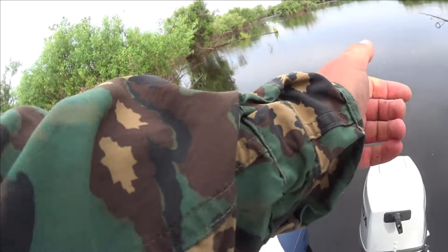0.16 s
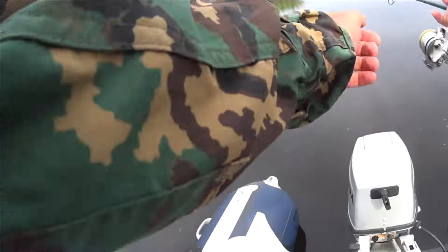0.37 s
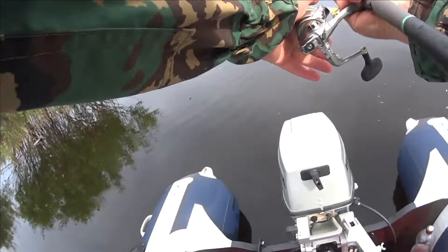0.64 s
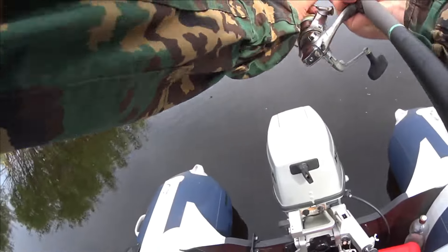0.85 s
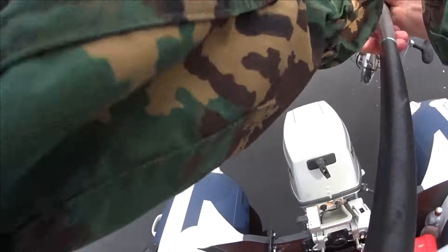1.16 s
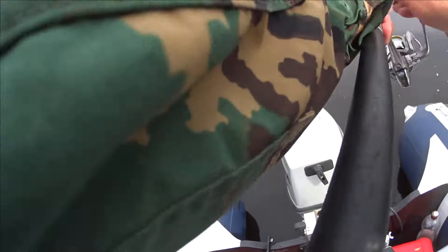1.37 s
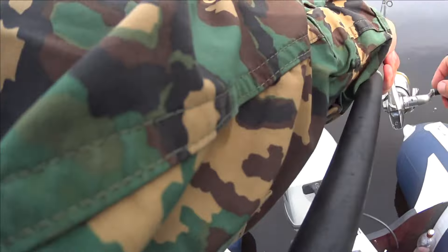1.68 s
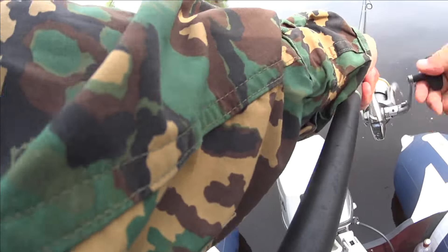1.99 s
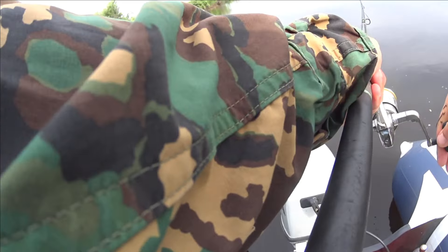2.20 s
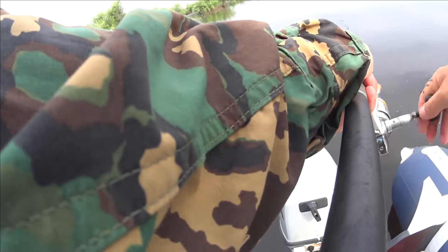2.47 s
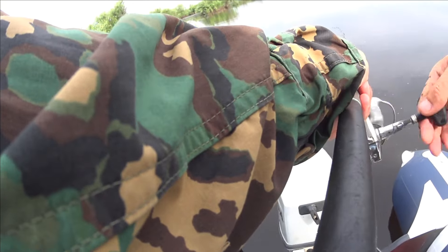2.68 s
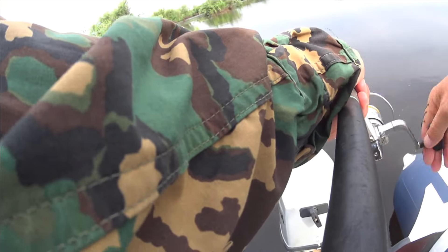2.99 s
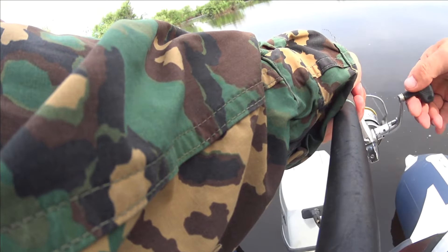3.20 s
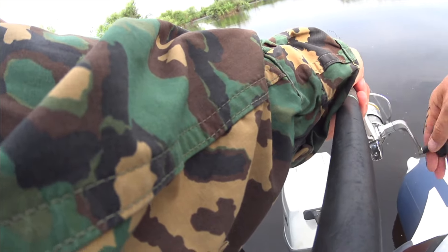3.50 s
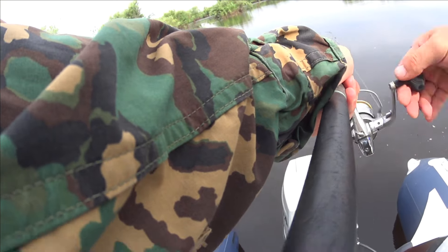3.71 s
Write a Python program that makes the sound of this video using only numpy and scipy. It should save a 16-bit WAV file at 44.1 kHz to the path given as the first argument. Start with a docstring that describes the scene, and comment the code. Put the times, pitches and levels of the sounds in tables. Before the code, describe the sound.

Many terns chatter and cry over each other around a small boat as fishing gear snaps once.

```python
"""A colony of water birds, probably terns, calls around a small boat near a bushy lake shore.
Over a low rumble, harsh rasps, far chatter and a thin whistle sound first; clear, fluttering cries soon join.
Soft knocks of hand and gear begin early; near 0.9 s the reel ticks and the tackle snaps; later a small bird chips.
Voices are harmonic series, with throat noise in the rasps; the snap is damped modes and noise, the knocks
and rumble are coloured noise, and the shore returns a faint, diffuse echo of the birds."""
import sys
import numpy as np
from scipy import signal
from scipy.fft import rfft, irfft
from scipy.io import wavfile
from scipy.ndimage import map_coordinates

SR = 44100
rng = np.random.default_rng(int(sys.argv[2]) if len(sys.argv) > 2 else 0)


def int16_out(signal):
    """Quantize to a 16-bit WAV file."""
    q = np.round(np.clip(np.atleast_2d(signal).T, -1, 1) * 32767)
    wavfile.write(sys.argv[1], SR, q.astype(np.int16))


N = 169785  # samples, 3.85 s

# Spectral density of the low rumble: frequency_hz, relative_density_db
RUMBLE_SPECTRUM = [(15, -35), (25, 0), (54, -3.5), (79, 1), (167, -9), (375, -11), (432, -13), (684, -16),
                   (954, -21), (1100, -22), (1430, -44), (2420, -120)]
# Level of the sleeve's rustle: time_s, level_db
RUSTLE_LEVEL = [(0, -62), (.45, -51.5), (.9, -60), (1.3, -54.5), (1.9, -65), (3.85, -68)]
# Spectral density of the rustle: frequency_hz, relative_density_db
RUSTLE_SPECTRUM = [(100, -12), (250, -7), (500, -9.5), (1000, -9.5), (4000, -10.5), (11000, -36)]
# Spectral density of the blur of far birds: frequency_hz, relative_density_db
COLONY_SPECTRUM = [(530, -44), (900, -26.5), (1280, -8.5), (1830, -23), (2490, -4.5), (2880, -11.5),
                   (3370, -4), (4150, -18), (5070, -13.5), (6250, -22), (11000, -32.5), (14300, -70),
                   (22000, -120)]
# Level of the chattering flock further off: time_s, level_db
FLOCK_LEVEL = [(.2, -56), (.5, -50), (1.4, -51), (2.2, -57.5), (3.85, -57.5)]
# Harsh rasps: start_s, length_s, pitch_hz, level_db, tilt_db_per_octave
RASPS = [(0, 0.22, 1563, -43.5, 1), (.17, 0.064, 1615, -43.5, -0.5), (0.349, 0.081, 1597, -39, 4),
         (0.424, 0.11, 1700, -38.5, 2.5), (.69, 0.14, 1720, -38, 4.5), (0.826, .11, 1685, -35.5, 3),
         (0.941, .165, 1619, -39, 1.5), (1.102, 0.11, 1596, -43.5, 1), (1.24, 0.18, 1622, -42, 3),
         (1.429, 0.1, 1648, -43.5, 4), (1.555, .13, 1650, -42.5, 2), (1.859, 0.19, 1657, -42.5, -1),
         (2.238, .19, 1666, -43, -3), (2.424, 0.11, 1590, -48.5, -4), (2.615, 0.179, 1620, -47.5, -4.5),
         (2.796, 0.099, 1653, -51.5, -5), (2.977, 0.078, 1644, -48, -4), (3.051, 0.16, 1631, -45.5, -5),
         (3.294, 0.03, 1710, -53.5, -2), (3.351, 0.09, 1649, -45.5, -2), (3.432, 0.13, 1582, -47.5, -2.5),
         (3.712, 0.14, 1651, -47.5, -2.5)]
# Harmonics of a rasp, first to sixth: relative_level_db
RASP_HARMONICS_DB = [-14, 2.5, -6, -15.5, -21, -24.5]
# Spectral density of turbulence in the throat: frequency_hz, relative_density_db
THROAT_SPECTRUM = [(530, -60), (900, -37), (1110, -24.5), (1280, -7.5), (1440, -12), (1740, -7.5),
                   (2100, -16), (3200, -1.5), (3740, -5), (4710, -1), (5450, -27.5), (5990, -9),
                   (7540, -34.5), (8920, -25), (11000, -53), (14300, -68), (22000, -120)]
# Level of the thin whistle: time_s, level_db
WHISTLE_LEVEL = [(2., -64), (2.1, -61.5), (2.5, -63), (2.85, -57), (3.1, -65), (3.24, -56.5), (3.3, -65.5),
                 (3.56, -56.5), (3.58, -59), (3.62, -58), (3.66, -45), (3.685, -54), (3.74, -61)]
# Clear cries: start_s, length_s, start_pitch_hz, middle_pitch_hz, end_pitch_hz, level_db,
# extra_db (all harmonics but the second), flutter_hz (none unless positive)
CRIES = [(0.165, 0.22, 1855, 1795, 1762, -50, 11.5, 32.5), (0.381, 0.037, 1722, 1680, 1606, -38, 2, 0),
         (.435, 0.23, 1695, 1695, 1620, -38.5, -4.5, 44), (0.531, 0.043, 1790, 1986, 1820, -38.5, -6, 48),
         (0.716, .11, 1778, 1785, 1717, -39.5, 3.5, 36), (0.883, 0.044, 1810, 1936, 1750, -41, 1, 0),
         (0.935, 0.088, 1650, 1584, 1498, -34.5, -3.5, 40.5), (1.038, .065, 1620, 1700, 1574, -36, -1.5, 0),
         (1.09, 0.056, 1436, 1373, 1350, -46, 1.5, 45.5), (1.2, 0.044, 1780, 1750, 1600, -39, -2, 0),
         (1.244, 0.14, 1640, 1582, 1650, -44.5, 6, 40.5), (1.374, 0.068, 1674, 1705, 1630, -43.5, 5, 0),
         (1.464, 0.12, 1740, 1883, 1794, -39.5, 1.5, 32), (1.515, 0.035, 1660, 1740, 1680, -38.5, -2, 0),
         (1.563, .1, 1804, 1662, 1565, -45.5, 5.5, 48), (1.677, .185, 1853, 1800, 1715, -41, -1, 39),
         (1.687, 0.09, 1600, 1567, 1510, -47.5, 3.5, 38.5), (1.879, .06, 1722, 1625, 1573, -44, -0.5, -0.5),
         (2.027, 0.044, 1757, 1740, 1630, -44.5, 1.5, 0), (2.054, 0.044, 1916, 1846, 1710, -42.5, 0, 0),
         (2.111, 0.029, 1673, 1715, 1630, -47.5, -0.5, 0), (2.141, 0.036, 1624, 1740, 1550, -53.5, 11.5, 0),
         (2.178, 0.046, 1670, 1652, 1590, -51, 7.5, 0), (2.221, 0.057, 1677, 1668, 1580, -45.5, 6, 0),
         (2.386, 0.045, 1660, 1703, 1620, -47.5, -8, -0.5),
         (2.426, 0.051, 1820, 1830, 1625, -46.5, -1, -4.5), (2.533, 0.035, 1628, 1693, 1600, -40.5, 0, 0),
         (2.577, 0.23, 1545, 1650, 1577, -47, 0, 43.5), (2.801, 0.033, 1685, 1715, 1675, -44, -3, 0),
         (2.842, .053, 1645, 1687, 1550, -48.5, -2, -4), (3.046, 0.054, 1648, 1685, 1550, -36, -5, 40),
         (3.1, .095, 1530, 1440, 1430, -45, -8, 40), (3.038, 0.16, 1758, 1822, 1757, -51, 5.5, 31.5),
         (3.192, 0.068, 1800, 1740, 1530, -43, 1, 31), (3.433, 0.06, 1420, 1430, 1380, -43, -12, 48),
         (3.551, 0.049, 1687, 1600, 1450, -45.5, 1, 0), (3.559, 0.043, 1820, 1720, 1580, -44, -1, 0),
         (3.6, .035, 1604, 1758, 1580, -48.5, 5.5, 0), (3.598, 0.12, 1870, 1897, 1853, -54, 3, 35),
         (3.694, 0.088, 1840, 1785, 1684, -46.5, -4, 39.5),
         (3.769, 0.089, 1560, 1507, 1430, -45.5, -5, 40.5)]
# Harmonics of a cry, first to sixth: relative_level_db
CRY_HARMONICS_DB = [-13, -0.5, -10, -22, -28.5, -35]
# Soft knocks in the boat: start_s, level_db, centre_hz
KNOCKS = [(0.343, -44.5, 300), (0.362, -44, 280), (.418, -47.5, 450), (.604, -45.5, 453),
          (.654, -44.5, 450), (1.055, -37.5, 290), (1.823, -41, 1920)]
# Spectral density of the reel's tick: frequency_hz, relative_density_db
TICK_SPECTRUM = [(2000, -12), (5000, -3), (9000, 0)]
# Ringing modes of the tackle: frequency_hz, relative_level_db, t60_s
SNAP_MODES = [(910, -40, .03), (1380, -33, 0.015), (1800, -5.5, 0.07), (1904, -2.5, 0.05),
              (3270, -8.5, 0.028), (3280, -13, .012), (4030, -25, .022), (5574, -27, .012),
              (6130, -22, .01)]
# Spectral density of the snap's crack: frequency_hz, relative_density_db
CRACK_SPECTRUM = [(500, -15), (1200, -8.5), (3400, -1), (6300, 0), (8000, -6.5), (11000, -10)]

RUMBLE_DB, RUMBLE_SIDE_DB = -58.5, -3.5  # the side level is relative to the rumble
HUM_HZ, HUM_DB, COLONY_DB = 75.3, -69, -57.5
FLOCK_CALLS_PER_S, FLOCK_HZ, FLOCK_LENGTH_S, FLOCK_FLUTTER_HZ = 30, 1590, .08, 44
FLOCK_SPREAD, FLOCK_FALL = .14, .11  # fractions: spread of pitch and flutter rate, fall of pitch
RASP_EDGE_S, RASP_SWELL_DB, RASP_AIR_DB = 0.009, 3, -2  # the air is relative to the voice
RASP_JITTER, RASP_JITTER_PER_S = 0.04505, 840  # fraction of pitch, random values per second
RASP_WOBBLE, RASP_WOBBLE_PER_S = .03, 89.94  # the same, slower
RASP_GRAIN_DB, RASP_GRAIN_PER_S = 2.5, 400.2  # random values per second
RASP_BEAT_HZ, RASP_BEAT_DB = 49.7, 2
WHISTLE_HZ, WHISTLE_JITTER = 2502, 0.00412  # jitter as a fraction of pitch
ECHO_DB, ECHO_DECAY_S = -16, .09  # relative to the birds, time to fall to 1/e
CRY_EDGE_S, CRY_JITTER, CRY_SHIMMER_DB = 0.0053, 0.0071, 2.5  # jitter as a fraction of pitch
FLUTTER_SAG, FLUTTER_DIP_DB, FLUTTER_SHARP = 0.12, -6.5, 7  # fraction of pitch, level, steepness
KNOCK_EDGE_S, KNOCK_DECAY_S = 0.00041, 0.0063
TICK_S, TICK_DB, TICK_DECAY_S = .853, -38, 0.0022
SNAP_S, SNAP_DB, REBOUND_S, REBOUND_DB = .9132, -20.5, .0075, -10.5  # rebound relative to the snap
CRACK_DB, CRACK_RISE_S, CRACK_DECAY_S = -22, 0.0016, 0.00077
SNAP_TAIL_DB, SNAP_TAIL_DECAY_S = -31.5, 0.018
CHIP_S, CHIP_LENGTH_S, CHIP_FROM_HZ, CHIP_TO_HZ, CHIP_DB = 3.264, .016, 6000, 5380, -48
PAN_DB, PAN_SPREAD_DB, LEFT_LAG_S, LAG_SPREAD_S = 1.1, 0.75, .000019, .000004
TOP_HZ = 11150


def undb(db):
    """Logarithmic level: 20 dB is a factor of ten in amplitude."""
    return 10 ** (np.asarray(db) / 20)


def unit(x):
    """Normalization: scale to an rms of 1."""
    return x / np.sqrt(np.mean(x ** 2) + 1e-20)


def level_curve(points, t):
    """Linear interpolation of a level in dB between (time, level) points."""
    times, levels = np.array(points).T
    return np.interp(t, times, levels)


def noise(spectrum, size, tilt_db=0):
    """Spectral shaping: white noise weighted by a density curve and a tilt per octave, rms 1."""
    hz, db = np.array(spectrum, float).T
    octave = np.log2(np.fft.rfftfreq(size, 1 / SR) + 1)  # 1 Hz offset keeps the logarithm finite
    gain = undb(np.interp(octave, np.log2(hz), db) + tilt_db * octave)
    gain = gain * np.minimum(2 ** octave / hz[0], 1) ** 2  # roll off below the first point
    return unit(irfft(rfft(rng.standard_normal(size)) * gain, size))


def wander(rate, t):
    """Band-limited fluctuation: random values, rate per second, joined by cubic splines."""
    return map_coordinates(rng.standard_normal(2048), [t * rate], order=3, mode="wrap")


def add(out, x, start):
    """Superposition: mix a sound in at a time in seconds."""
    i = max(int(start * SR), 0)
    part = x[..., :max(N - i, 0)]
    out[..., i:i + part.shape[-1]] += part


def place(x):
    """Binaural cues: direction by level and delay, typically louder on the left, earlier on the right."""
    a, b = rng.standard_normal(2)
    pan_db = PAN_DB + PAN_SPREAD_DB * a
    lag = LEFT_LAG_S + LAG_SPREAD_S * b
    delay = np.exp(-2j * np.pi * np.fft.rfftfreq(len(x), 1 / SR) * lag)
    late = irfft(rfft(x) * delay, len(x))
    return np.array([late * undb(pan_db / 2), x * undb(-pan_db / 2)])


def edges(t, edge):
    """Amplitude envelope: sine-squared attack, hold and release."""
    nearest_end = np.minimum(t, t[-1] - t)
    return np.sin(np.pi / 2 * np.clip(nearest_end / edge, 0, 1)) ** 2


def syrinx(hz, harmonics_db):
    """Harmonic series: sinusoids at whole multiples of a moving pitch, levels in rms dB."""
    phase = 2 * np.pi * np.cumsum(hz) / SR
    return np.sqrt(2) * sum(undb(db) * np.sin((k + 1) * phase) for k, db in enumerate(harmonics_db))


def flutter(hz, t):
    """Register switching: near 1 while a trilling voice has jumped to its lower register, else near 0."""
    return (hz > 0) * (1 + np.tanh(FLUTTER_SHARP * (np.cos(2 * np.pi * hz * t) - .66))) / 2


def lakeside(t):
    """Diffuse background: low rumble, faint hum, a rustling sleeve and the noise-like blur of far birds."""
    side = noise(RUMBLE_SPECTRUM, N, tilt_db=6.0) * np.array([[1], [-1]])  # opposite in the two ears
    rumble = noise(RUMBLE_SPECTRUM, N) + undb(RUMBLE_SIDE_DB) * side
    hum = syrinx(HUM_HZ * (1 + 0.019 * wander(12, t)), [HUM_DB + 3 * wander(4.86, t)])
    cloth = np.array([noise(RUSTLE_SPECTRUM, N) for _ in range(2)])
    rustle = cloth * undb(level_curve(RUSTLE_LEVEL, t) + 2.8 * wander(39.94, t))
    colony = place(noise(COLONY_SPECTRUM, N) * undb(COLONY_DB + 1.2 * wander(16, t)))
    return undb(RUMBLE_DB) * rumble + hum + rustle + colony


def flock(t):
    """Incoherent sum: birds further off chatter in overlapping, falling trills, each on its own pitch."""
    out = np.zeros((2, N))
    for slot in range(int(N / SR * FLOCK_CALLS_PER_S)):
        pitch, pace, span, delay = rng.uniform(-1, 1, 4)
        age = np.arange(int(FLOCK_LENGTH_S * (1 + span / 2) * SR)) / SR
        low = flutter(FLOCK_FLUTTER_HZ * (1 + FLOCK_SPREAD * pace), age)
        fall = FLOCK_FALL * (age / age[-1]) ** 2
        hz = FLOCK_HZ * (1 + FLOCK_SPREAD * pitch - fall - FLUTTER_SAG * low)
        call = syrinx(hz, CRY_HARMONICS_DB) * edges(age, RASP_EDGE_S) * undb(FLUTTER_DIP_DB * low)
        add(out, place(call), (slot + delay) / FLOCK_CALLS_PER_S)
    return unit(out) * undb(level_curve(FLOCK_LEVEL, t))


def rasps():
    """Irregular phonation: pitch and strength jump about, with throat turbulence and a rattling beat."""
    out = np.zeros((2, N))
    octaves = np.log2(1 + np.arange(len(RASP_HARMONICS_DB)))
    for start, length, pitch, db, tilt_db in RASPS:
        t = np.arange(int(length * SR)) / SR
        colour = np.array(RASP_HARMONICS_DB) + tilt_db * octaves
        jitter = RASP_JITTER * wander(RASP_JITTER_PER_S, t)
        wobble = RASP_WOBBLE * wander(RASP_WOBBLE_PER_S, t)
        hz = pitch * (1 + jitter + wobble)
        voice = unit(syrinx(hz, [h + 3 * wander(199.7, t) for h in colour]))
        voice = voice + undb(RASP_AIR_DB) * noise(THROAT_SPECTRUM, len(t), tilt_db)
        beat = np.cos(2 * np.pi * RASP_BEAT_HZ * t + wander(22.6, t))
        grain_db = RASP_GRAIN_DB * wander(RASP_GRAIN_PER_S, t)
        voice = unit(voice * undb(grain_db - RASP_BEAT_DB * beat))
        swell_db = RASP_SWELL_DB * (np.sin(np.pi * t / length) - 2 / np.pi)  # zero on average
        add(out, place(voice * edges(t, RASP_EDGE_S) * undb(db + swell_db)), start)
    return out


def whistle(t):
    """Pure tone: one nearly steady sinusoid whose level rises and falls, strongest late."""
    hz = WHISTLE_HZ * (1 + WHISTLE_JITTER * wander(120, t))
    return place(syrinx(hz, [level_curve(WHISTLE_LEVEL, t) + 2 * wander(29.78, t)]))


def shore(x):
    """Diffuse reflection: the bushes return a faint echo, by convolution with decaying noise."""
    t = np.arange(SR // 2) / SR
    tail = rng.standard_normal((2, len(t))) * np.exp(-t / ECHO_DECAY_S)
    tail = tail / np.sqrt(np.sum(tail ** 2, axis=1, keepdims=True))  # unit energy
    return undb(ECHO_DB) * signal.fftconvolve(x, tail, axes=1)[:, :N]


def cries():
    """Frequency modulation: arched harmonic notes, many of them notched by a quick flutter."""
    out = np.zeros((2, N))
    not_second = np.arange(len(CRY_HARMONICS_DB)) != 1
    for start, length, first, middle, last, db, extra_db, flutter_hz in CRIES:
        t = np.arange(int(length * SR)) / SR
        arch = np.polyval(np.polyfit([0, .5, 1], [first, middle, last], 2), t / length)
        notch = flutter(flutter_hz, t)
        hz = arch * (1 - FLUTTER_SAG * notch + CRY_JITTER * wander(342.7, t))
        colour = np.array(CRY_HARMONICS_DB) + extra_db * not_second
        voice = syrinx(hz, [h + CRY_SHIMMER_DB * wander(128.7, t) for h in colour])
        add(out, place(voice * edges(t, CRY_EDGE_S) * undb(db + FLUTTER_DIP_DB * notch)), start)
    return out


def knocks():
    """Damped impact: bumps of hand and gear, each a quickly decaying noise about its centre frequency."""
    out, t = np.zeros((2, N)), np.arange(4096) / SR
    for start, db, hz in KNOCKS:
        spectrum = [(hz / 4, -10), (hz, 0), (hz * 2, -9), (hz * 8, -36), (hz * 20, -60)]
        envelope = edges(t, KNOCK_EDGE_S) * np.exp(-t / KNOCK_DECAY_S)
        add(out, place(noise(spectrum, len(t)) * undb(db) * envelope), start)
    return out


def tick(t):
    """Transient: a light, bright tick of the reel, noise under an exponential decay."""
    decay = (t > TICK_S) * np.exp(-np.abs(t - TICK_S) / TICK_DECAY_S)
    return place(noise(TICK_SPECTRUM, N) * undb(TICK_DB) * decay)


def ring(age):
    """Modal decay: the tackle's modes, struck at age zero, die away exponentially."""
    age = np.clip(age, 0, 1)  # silent before the blow
    return sum(undb(db) * np.sin(2 * np.pi * hz * age) * np.exp(-np.log(1000) * age / t60)
               for hz, db, t60 in SNAP_MODES)


def snap(t):
    """Impulsive excitation: a crack of noise, short ringing modes of the tackle and one rebound."""
    age = t - SNAP_S
    body = undb(SNAP_DB) * (ring(age) + undb(REBOUND_DB) * ring(age - REBOUND_S))
    crack = undb(CRACK_DB) * np.exp(-np.abs(age) / np.where(age < 0, CRACK_RISE_S, CRACK_DECAY_S))
    tail = undb(SNAP_TAIL_DB) * (age > 0) * np.exp(-np.abs(age) / SNAP_TAIL_DECAY_S)
    return place(body + (crack + tail) * noise(CRACK_SPECTRUM, len(t)))


def chip():
    """Frequency glide: one very short, falling sinusoidal note of a small bird."""
    out, t = np.zeros((2, N)), np.arange(int(CHIP_LENGTH_S * SR)) / SR
    hz = np.linspace(CHIP_FROM_HZ, CHIP_TO_HZ, len(t)) * (1 + .02 * wander(600, t))
    add(out, place(syrinx(hz, [CHIP_DB]) * edges(t, .006)), CHIP_S)
    return out


def scene():
    """Superposition of the lake, the birds with their echo, and the sounds of the boat."""
    t = np.arange(N) / SR
    birds = flock(t) + rasps() + whistle(t) + cries() + chip()
    return lakeside(t) + birds + shore(birds) + knocks() + tick(t) + snap(t)


def record(dry):
    """Band limiting: a steep elliptic low-pass removes the top of the spectrum."""
    low_pass = signal.ellip(10, .2, 80, TOP_HZ, fs=SR, output="sos")  # 0.2 dB ripple, 80 dB rejection
    return signal.sosfilt(low_pass, dry)


dry = scene()
out = record(dry)
int16_out(out)
```